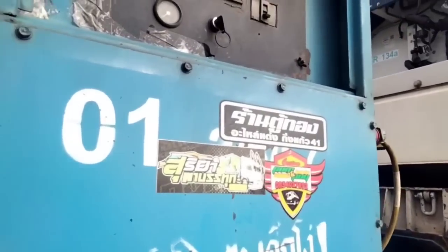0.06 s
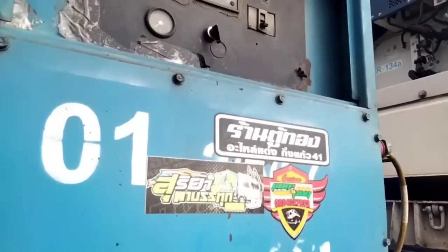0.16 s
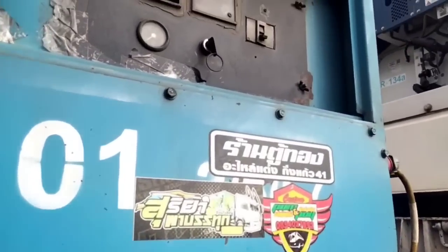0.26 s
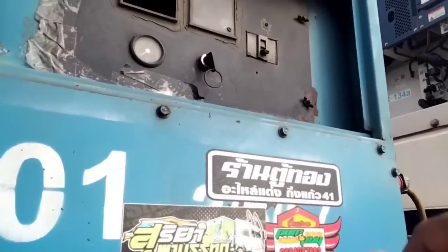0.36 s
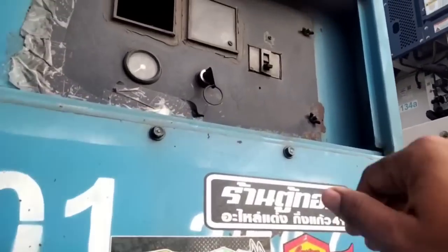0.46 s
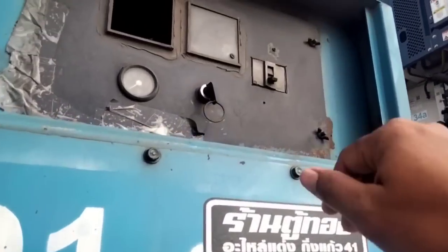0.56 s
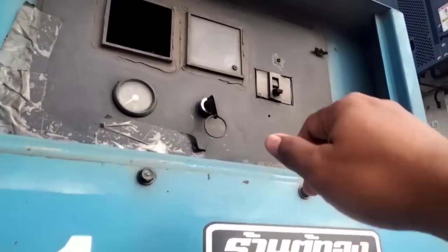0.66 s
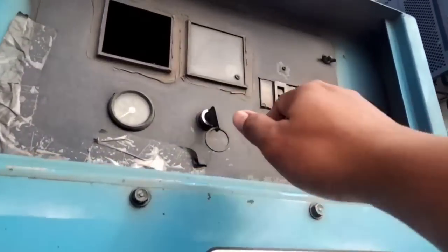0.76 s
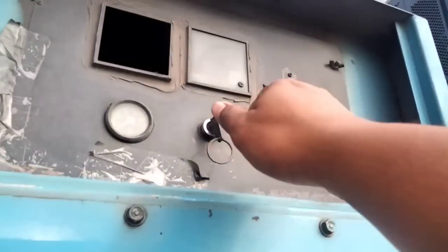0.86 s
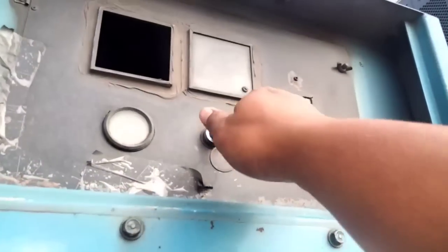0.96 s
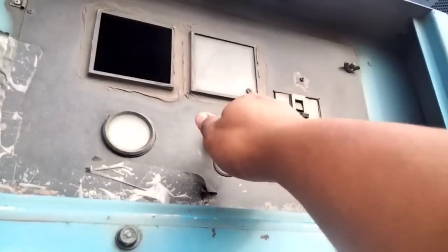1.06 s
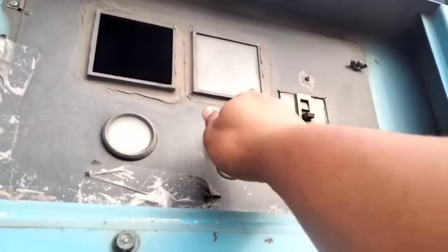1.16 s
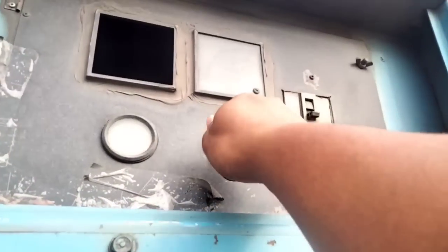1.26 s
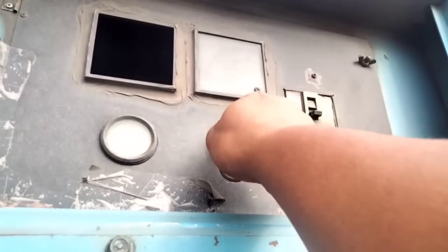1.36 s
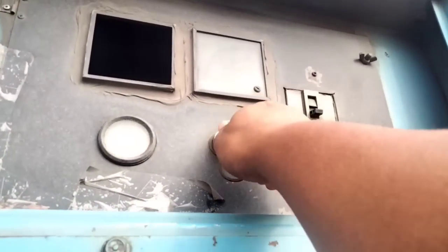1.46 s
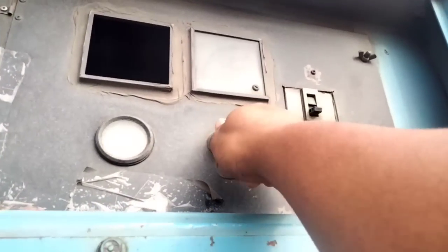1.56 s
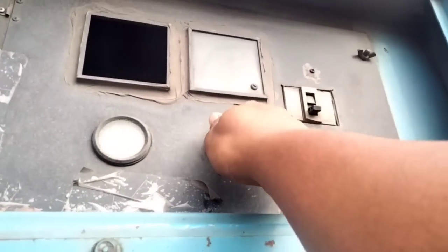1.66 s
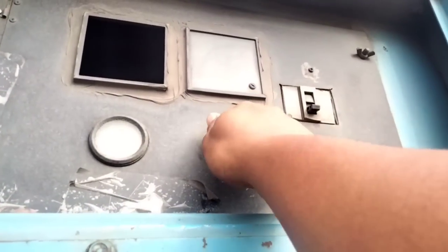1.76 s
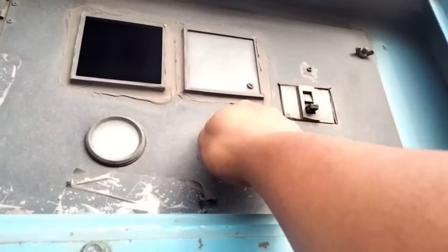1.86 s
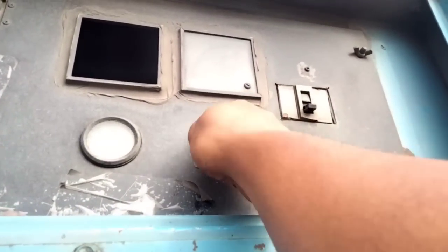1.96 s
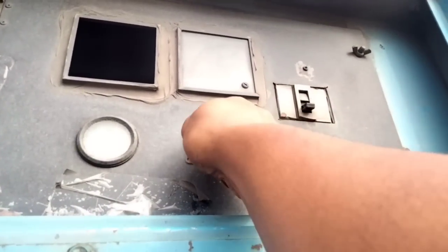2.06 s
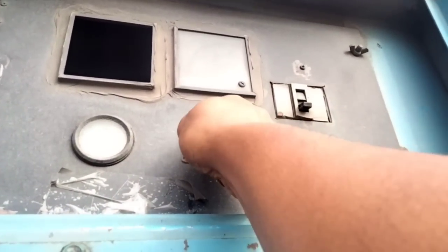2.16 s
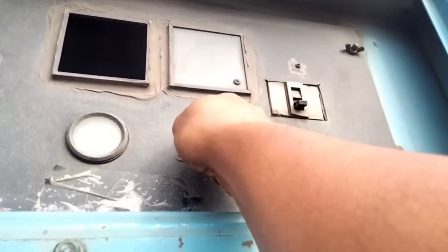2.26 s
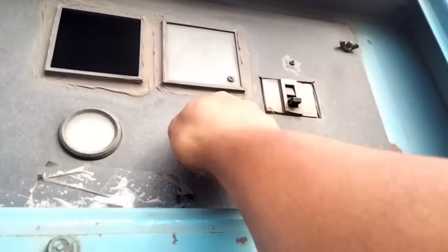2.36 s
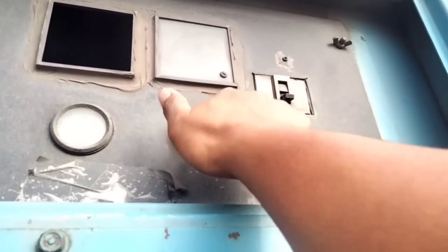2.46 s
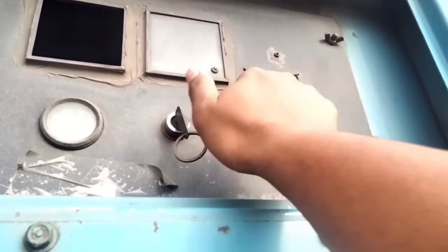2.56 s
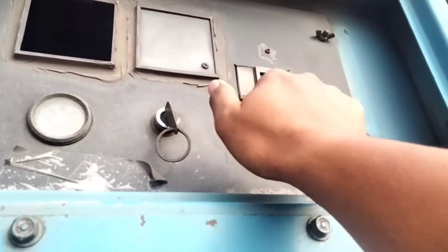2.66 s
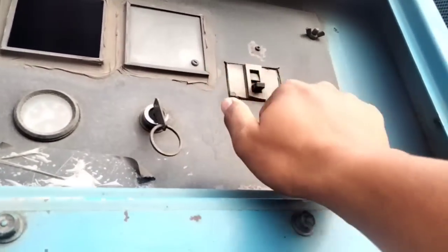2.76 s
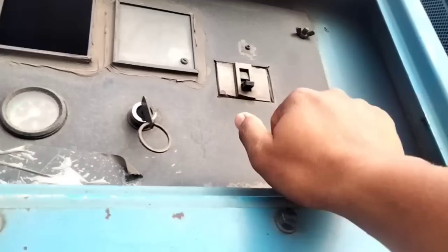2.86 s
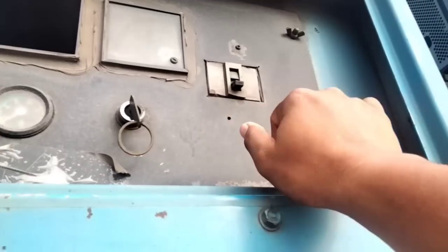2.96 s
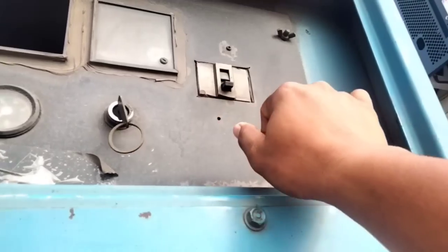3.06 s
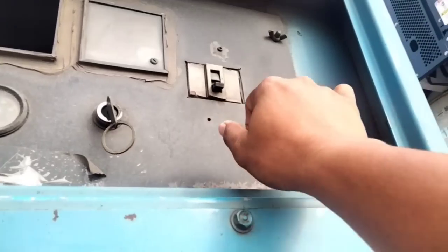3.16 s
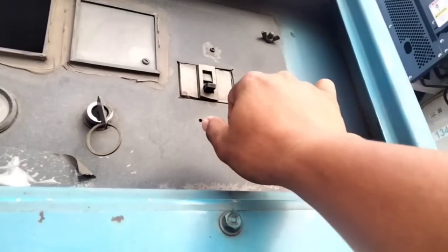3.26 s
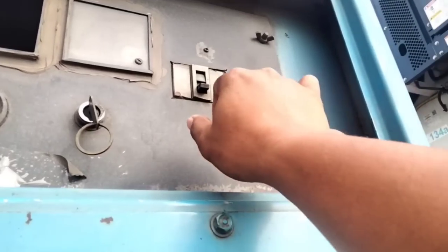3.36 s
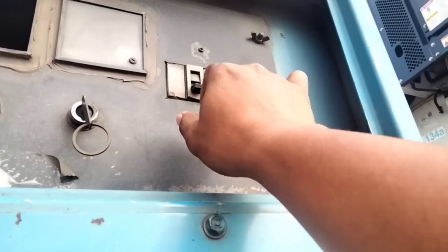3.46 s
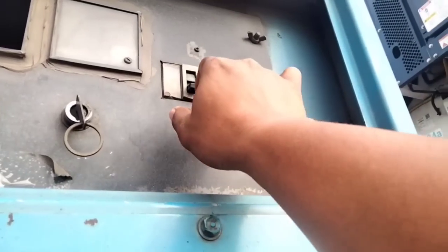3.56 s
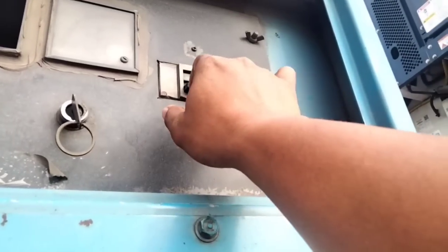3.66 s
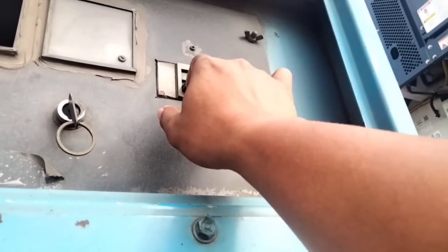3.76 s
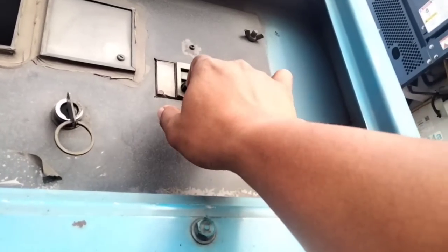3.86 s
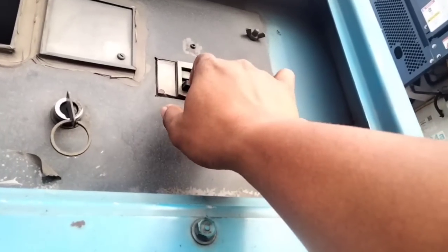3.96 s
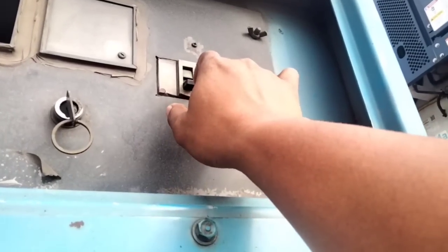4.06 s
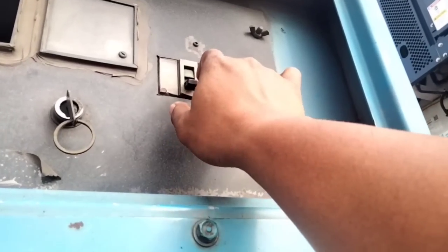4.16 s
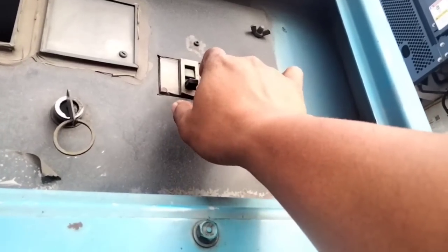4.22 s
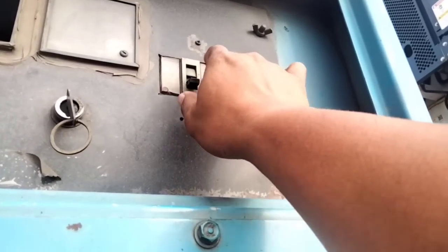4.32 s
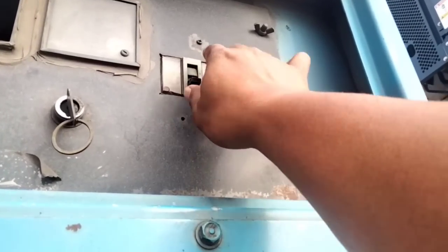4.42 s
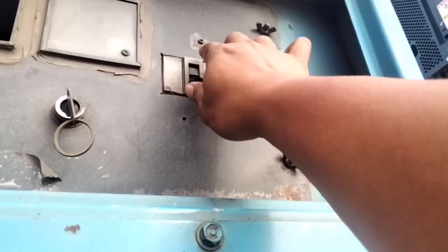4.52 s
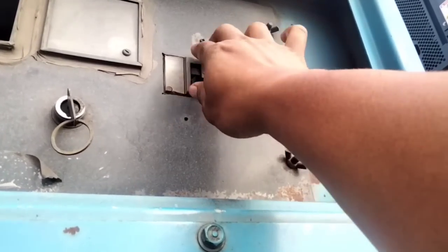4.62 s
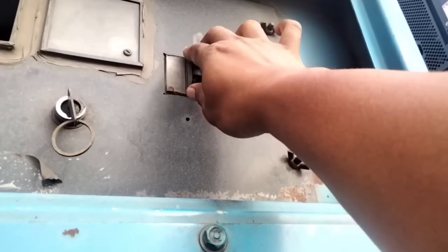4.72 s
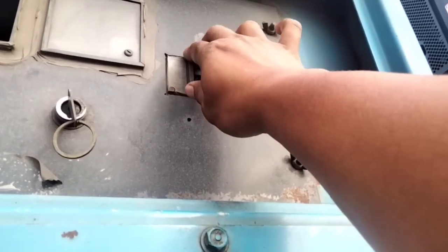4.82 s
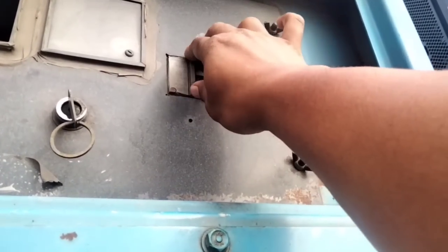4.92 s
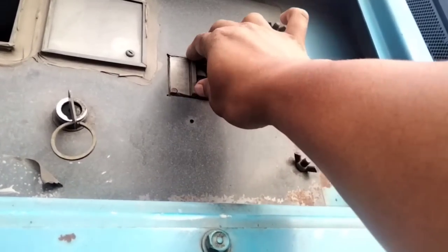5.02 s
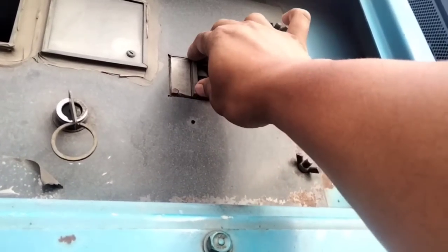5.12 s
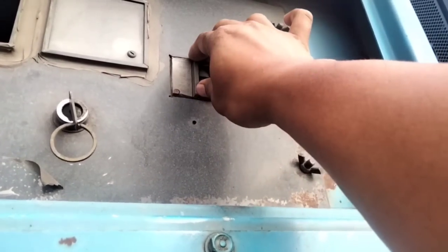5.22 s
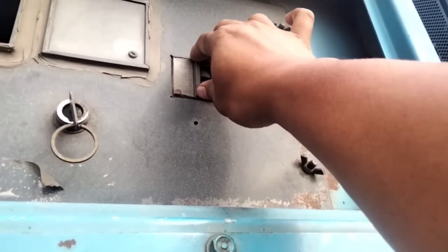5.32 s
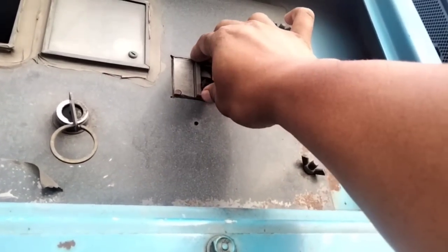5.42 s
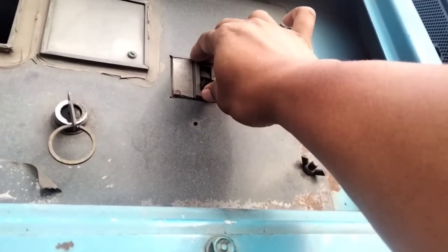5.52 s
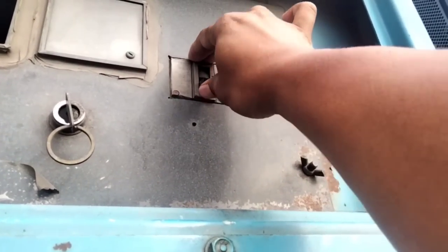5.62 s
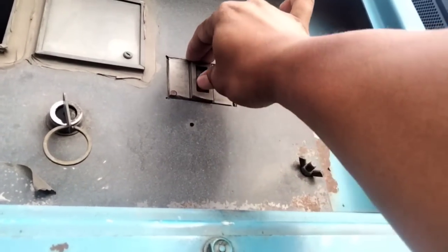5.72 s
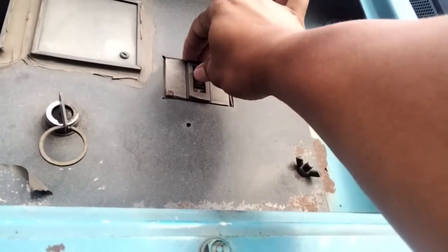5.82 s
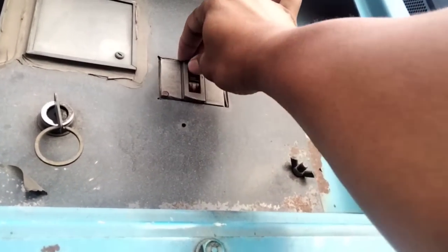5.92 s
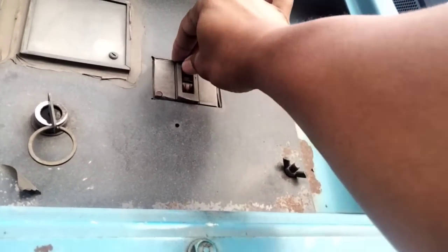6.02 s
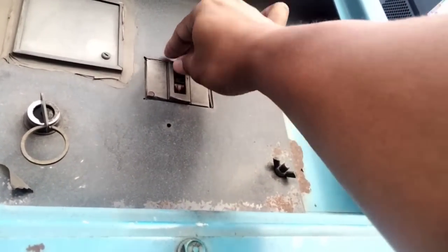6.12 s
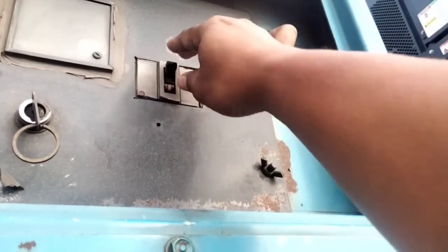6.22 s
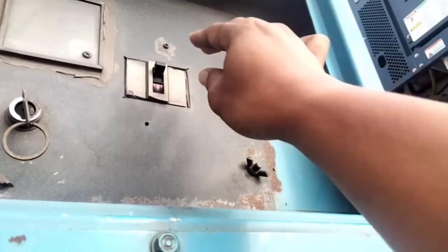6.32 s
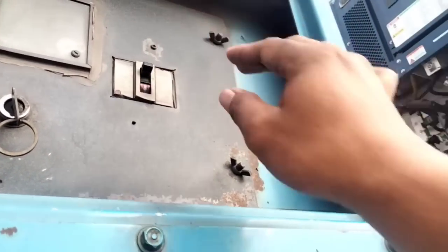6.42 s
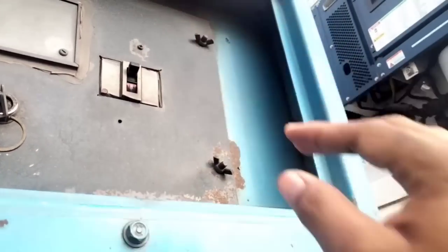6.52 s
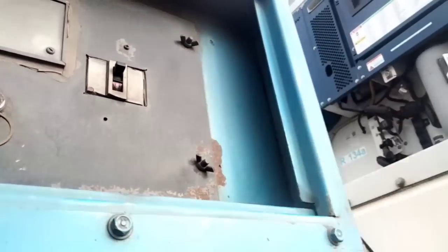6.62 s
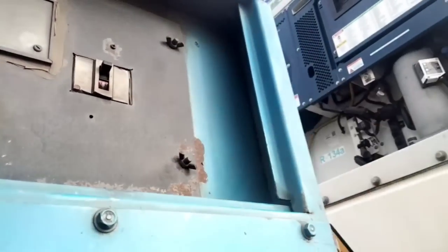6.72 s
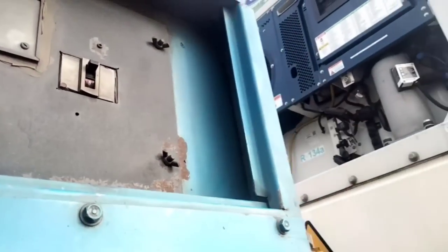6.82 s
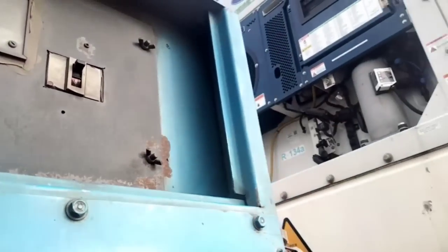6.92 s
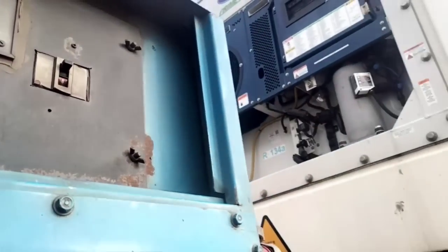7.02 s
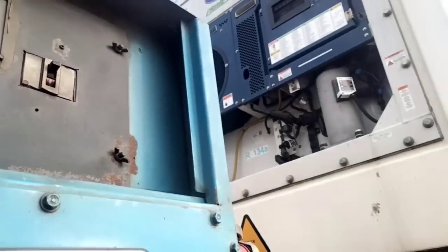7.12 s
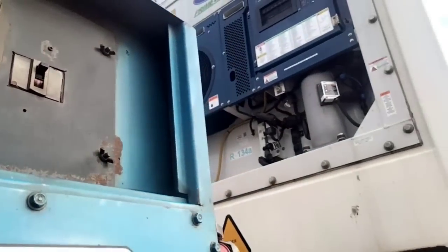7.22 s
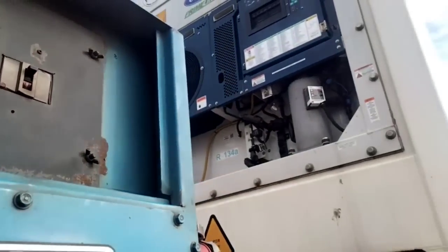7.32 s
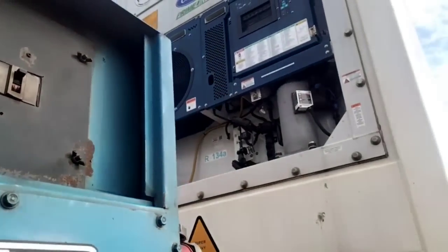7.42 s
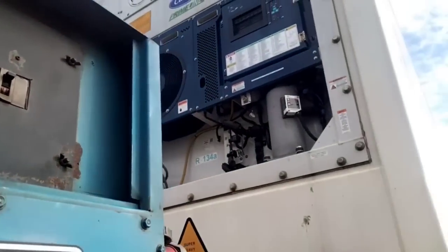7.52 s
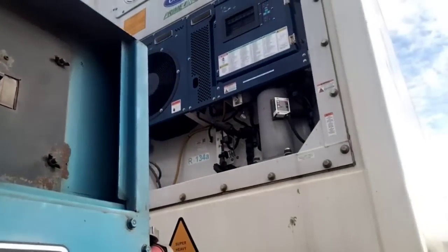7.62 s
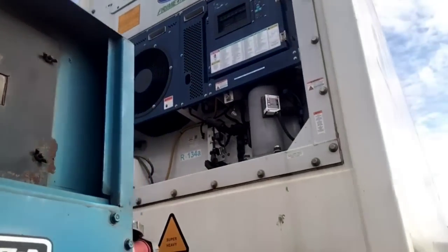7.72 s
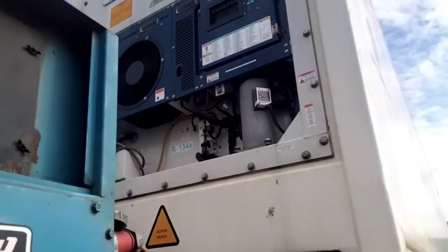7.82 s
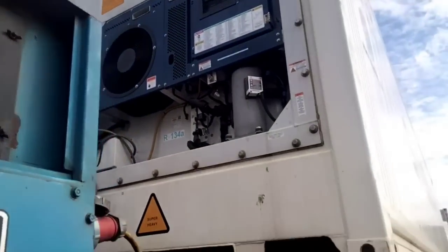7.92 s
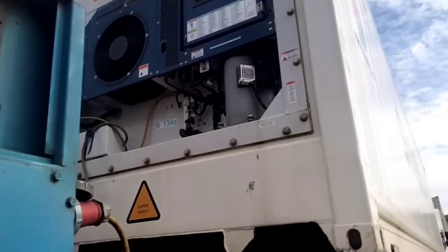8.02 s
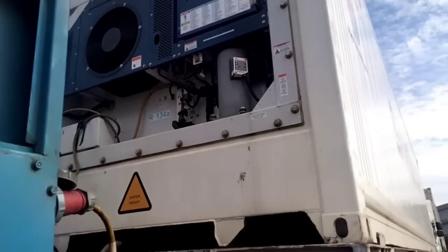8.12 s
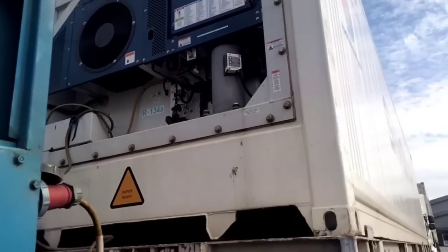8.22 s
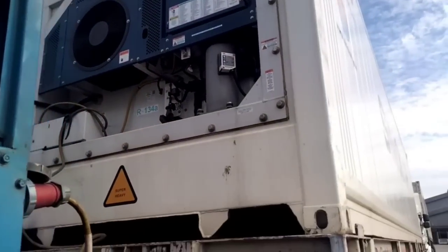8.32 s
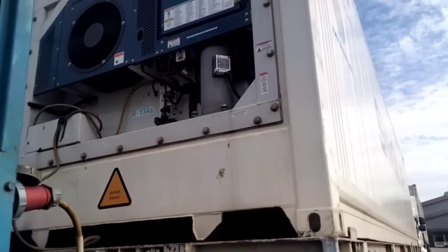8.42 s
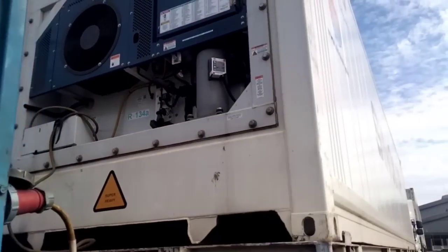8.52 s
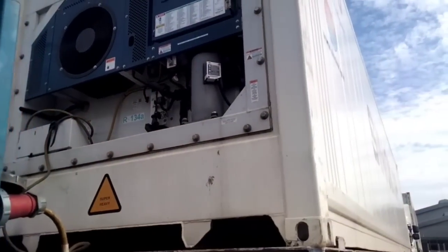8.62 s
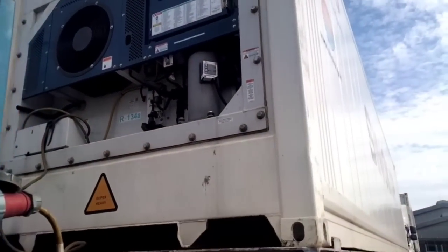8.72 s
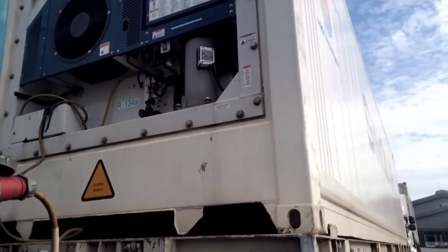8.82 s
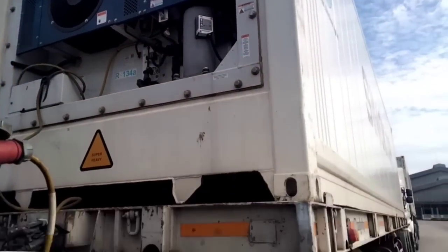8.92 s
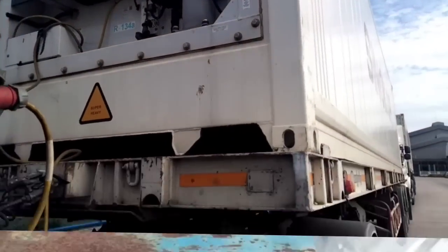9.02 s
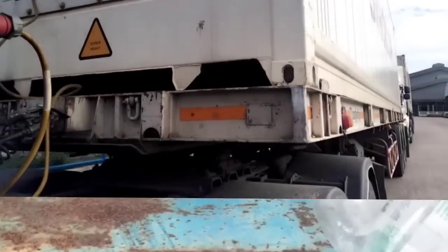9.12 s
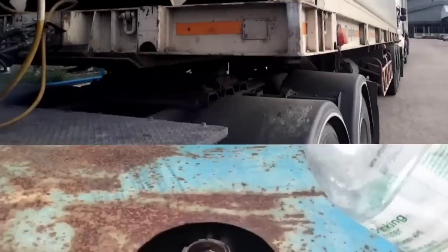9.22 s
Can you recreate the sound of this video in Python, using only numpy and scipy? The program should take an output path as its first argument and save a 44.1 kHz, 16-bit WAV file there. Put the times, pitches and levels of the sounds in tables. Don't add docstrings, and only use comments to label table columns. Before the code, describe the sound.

Handheld close microphone at a generator panel, open air. Quiet low hum and fan wash, fabric rustle and small key clicks come first. A sudden hard clank starts a short harsh gear grind with chirping belt squeals, then the diesel fires unevenly and holds a constant speed: deep drone, rapid knocking, ringing sheet metal, airy valve hiss. One hard switch snap momentarily ducks everything, and the engine runs on to the end.

```python
import sys
import numpy as np
from scipy import signal
from scipy.fft import rfft, irfft, next_fast_len
from scipy.io import wavfile
from scipy.ndimage import uniform_filter1d

SR = 44100
rng = np.random.default_rng(int(sys.argv[2]) if len(sys.argv) > 2 else 0)


def makeup_ratio(level_db):
    decades = np.asarray(level_db, float) / 20
    return 10 ** decades


def dump_mix(stems):
    frames = np.atleast_2d(stems).T
    limited = np.clip(frames, -1, 1)
    pcm = np.round(limited * 32767).astype(np.int16)
    wavfile.write(sys.argv[1], SR, pcm)


N = 409248
T = np.arange(N) / SR

# f/Hz, level/dB per Hz
BLOCK_SPECTRUM = [(240, -8), (400, -5.5), (480, -4), (622, -5), (754, -6.5), (990, -4.5), (1150, -11.5),
                  (1410, -8.5), (1930, -9), (2090, -6), (2510, -12), (3640, -12), (4780, -20),
                  (5240, -22.5), (6000, -19.5), (7800, -16.5), (13200, -120)]
# f/Hz, level/dB per Hz
HISS_SPECTRUM = [(2650, -5.5), (4500, -6), (4800, -5.5), (4990, -9), (5500, -11.5), (8320, 2.5),
                 (14200, -5.5), (15300, -8.5), (16100, -52.5), (16500, -73)]
# f/Hz, width/Hz, level/dB
CASING_MODES = [(220, 25.3, -2), (273.5, 26.5, -1), (147.3, 46, 1), (391, 64, -10.5)]


def noise(n=N):
    return rng.standard_normal(n)


def evened(x):
    return x / np.sqrt(np.mean(x ** 2) + 1e-20)


def columns(rows):
    s, *values = np.transpose(rows)
    return [np.interp(T, s, v) for v in values]


def coloured(x, points):
    hz, db = np.transpose(points)
    size = next_fast_len(len(x))
    bins_hz = np.fft.rfftfreq(size, 1 / SR)
    shape = makeup_ratio(np.interp(np.log(bins_hz + 1), np.log(hz + 1), db))
    return evened(irfft(rfft(x, size) * shape, size)[:len(x)])


def resonate(x, hz, width_hz, steady=0):
    turn = np.exp(2j * np.pi * np.cumsum(hz * np.ones(len(x))) / SR)
    r = np.exp(-np.pi * width_hz / SR)
    slow = signal.lfilter([1], np.convolve([1, -r], [1, -r]), x / turn)
    return evened((turn * slow / abs(slow) ** steady).real)


def ringing(x, modes):
    total = 0
    for hz, width_hz, db in modes:
        mode = signal.lfilter(*signal.iirpeak(hz, hz / width_hz, SR), x)
        total = total + makeup_ratio(db) * mode * np.sqrt(100 / width_hz)
    return evened(total)


def gate(on_s, off_s, fade_s):
    return np.clip((T - on_s) / fade_s, 0, 1) * np.clip((off_s - T) / fade_s, 0, 1)


def stroke(start_s, rise_s, until_s, fall_s, db):
    rise = np.clip((T - start_s) / rise_s, 0, 1)
    fall = np.clip(1 - (T - until_s) / fall_s, 0, 1)
    return makeup_ratio(db) * (rise * fall) ** 1.19


def struck(events, sound):
    envelope, t = np.zeros(N), T[:SR // 2]
    for s, db, t60_s in events:
        envelope[round(s * SR):][:len(t)] += makeup_ratio(db - 11.5 - 60 * t / t60_s)
    return envelope * sound


def flutter(hz, db):
    return np.interp(T * hz, np.arange(2000), makeup_ratio(db * noise(2000)))


def yard():
    far_engines = [(53.783, .0127), (55.87, .0055)]
    far_db = [-35.5, -44.5]
    # f/Hz, level/dB per Hz
    wash_spectrum = [(2.9, -60), (5.0, -29.5), (27, -13.5), (36, -7), (59, -6), (82, -20), (165, -15.5),
                     (186, -20.5), (229, -16.5), (294, -22.5), (700, -30.5), (910, -71.5), (1540, -120)]
    # f/Hz, level/dB per Hz
    fan_spectrum = [(290, -32), (500, -15.5), (731, -11), (799, -0.5), (834, -8.5), (898, -3), (1070, -7),
                    (2770, -11.5), (3020, -13.5), (5510, -20), (7170, -17), (8540, -16.5), (10500, -26),
                    (14700, -29.5), (16500, -43.5)]
    # f/Hz, width/Hz, level/dB
    fan_modes = [(2050, 130, 1), (2970, 100, -3), (3990, 160, -9), (8370, 400, -7)]
    phases = [2 * np.pi * hz * (T - s) for hz, s in far_engines]
    hum = sum(makeup_ratio(db) * np.cos(phase) for db, phase in zip(far_db, phases))
    hum = hum + makeup_ratio(-47.5) * flutter(6, 2) * np.sin(3 * phases[0])
    low, high = noise((2, N))
    wash = makeup_ratio(-39) * coloured(low, wash_spectrum) + makeup_ratio(-53.5) * ringing(low, [(228.3, 13, 0)])
    fans = coloured(high, fan_spectrum) + .3 * flutter(5, 1.3) * ringing(high, fan_modes)
    return np.sqrt(2) * hum + flutter(12, 0.98) * (wash + makeup_ratio(-48.5) * fans)


def cloth():
    # start/s, rise/s, hold until/s, fall/s, level/dB
    drags = [(-.1, 0.34, 0.282, .08, -42.5), (.3, .08, 0.486, 0.208, -42.5)]
    # f/Hz, level/dB per Hz
    cloth_spectrum = [(350, -26.5), (600, -2.5), (792, -14.5), (1270, -3), (1870, 0), (2470, -9.5),
                      (2800, 0), (4800, -17.5), (7490, -11), (9340, -17.5), (13800, -19), (15800, -20),
                      (16500, -44)]
    return sum(stroke(*row) for row in drags) * flutter(61.3, 1.26) * coloured(noise(), cloth_spectrum)


def grit_scuff():
    # start/s, rise/s, hold until/s, fall/s, level/dB
    scuff_stroke = (.716, .035, .785, .055, -33.5)
    # f/Hz, level/dB per Hz
    grit_spectrum = [(350, -54), (600, -24.5), (760, -6), (897, -23), (1000, -6), (3740, -3.5),
                     (5010, -14.5), (8250, -13), (15200, -18.5), (15800, -21), (16500, -49)]
    grains = noise() * (1 + 5 * (rng.random(N) < 400 / SR))
    return stroke(*scuff_stroke) * flutter(150, 1.47) * coloured(grains, grit_spectrum)


def keys():
    # t/s, peak/dB, t60/s
    ticks = [(0.2494, -41, 0.015), (0.2768, -33.5, 0.015), (1.0794, -42.5, 0.015), (1.1218, -22.5, 0.019),
             (1.163, -25.5, 0.015), (1.1922, -28.5, 0.015), (1.2221, -34.5, 0.015), (1.713, -27.5, 0.015),
             (1.8244, -35.5, 0.015), (1.9769, -28, 0.015)]
    # t/s, peak/dB, t60/s
    solenoid = [(1.997, -27, .08)]
    knocks = [(.25, -26, .03), (.278, -24.5, .03), (1.08, -37.5, .02)]
    bright = struck(ticks + solenoid, coloured(noise(), HISS_SPECTRUM))
    return bright + struck(knocks, coloured(noise(), BLOCK_SPECTRUM))


def breaker():
    # t/s, peak/dB, t60/s
    snaps = [(5.981, -5, 0.0333)]
    bright = coloured(noise(), HISS_SPECTRUM)
    snap = struck(snaps, bright + 0.32 * coloured(noise(), BLOCK_SPECTRUM))
    return snap + struck([(5.985, -29.5, 0.28)], ringing(bright, [(4300, 49, 0)]))


def shoves():
    # t/s, length/s, level/dB
    pushes = [
        (2.396, 0.081, -23),
        (2.803, .12, -36),
        (6.03, .14, -35),
        (9.22, .12, -34.5),
    ]
    return sum(makeup_ratio(db) * np.exp(-(2.5 * (T - s) / length_s) ** 2) for s, length_s, db in pushes)


def whistle(s, length_s, hz, glide, db):
    t = np.arange(-length_s, length_s, 1 / SR)
    tone = resonate(noise(len(t)), hz + glide * t, 30 + .026 * hz, steady=.5)
    return round((s - length_s) * SR), makeup_ratio(db + 2) * tone * np.exp(-(2.5 * t / length_s) ** 2)


def starter_grind():
    # t/s, drive/dB, load 0-1
    crank = [(2.012, -22.5, 0.58), (2.066, -25, 0.74), (2.128, -25, .86), (2.18, -31.5, .35),
             (2.226, -34.5, 0.54), (2.238, -22.5, 0.63), (2.265, -28, 0.17), (2.42, -27.5, 0.19),
             (2.5, -31.5, .35)]
    # t/s, peak/dB, treble minus peak/dB
    clanks = [(2.01, -5.5, -6), (2.032, -11, -7), (2.156, -21.5, 10.5), (2.197, -24.5, 6.5),
              (2.235, -8, -8.5), (2.261, -15.5, 5.5), (2.332, -16, 3), (2.394, -21.5, 1),
              (2.463, -20.5, 7.5), (2.574, -15, -6)]
    # f/Hz, level/dB per Hz
    gear_spectrum = [(240, -35), (400, -12.5), (463, -16), (817, 1.5), (1000, 1.5), (1150, -2.5),
                     (1850, -13), (2320, 0), (2750, -6.5), (4780, -17.5), (6000, -17), (7800, -45),
                     (13200, -120)]
    # f/Hz, width/Hz, level/dB
    housing_modes = [(872, 54, -3), (1464, 34, -2.5), (1735, 53, -3.5), (1993, 42, 0), (2329, 78, -1.5),
                     (2880, 90, -14.5), (3240, 65, -11)]
    clank_t60_s = 0.1006
    drive_db, load = columns(crank)
    load_db = 24 * (load - .5)
    casing_db = -28 + 0.31 * (drive_db + 26)
    teeth = noise((3, N)) * flutter(90, 1.6)
    casing = gate(2.018, 99, 0.0134) * ringing(teeth[0], CASING_MODES)
    gears = evened(coloured(teeth[1], gear_spectrum) + 0.78 * ringing(teeth[1], housing_modes))
    hiss = coloured(teeth[2], HISS_SPECTRUM)
    grind = makeup_ratio(casing_db) * casing
    grind = grind + makeup_ratio(drive_db + load_db - 6) * gears
    grind = grind + makeup_ratio(drive_db - load_db + 0.5) * hiss
    dull = struck([(s, db - 1.5, clank_t60_s) for s, db, _ in clanks], gears)
    sharp = struck([(s, db + top_db + 2.5, clank_t60_s) for s, db, top_db in clanks], hiss)
    return grind * gate(2.009, 2.56, 0.00265) + dull + sharp


def starter_tones():
    # peak t/s, length/s, f/Hz, glide/Hz per s, level/dB
    squeals = [
        (2.1, .085, 1180, 3200, -25.5),
        (2.25, .04, 820, -1200, -28),
        (2.36, .12, 800, -900, -31),
        (2.44, .08, 680, -900, -34),
        (2.59, .06, 930, -800, -31),
        (2.67, .06, 1780, 1000, -33),
    ]
    # t/s, f/Hz, level/dB
    pings = [(2.018, 2950, -24), (2.02, 2000, -27), (2.037, 850, -24), (2.04, 8900, -28),
             (2.065, 4900, -33), (2.165, 9300, -30), (2.24, 2300, -26), (2.243, 1700, -28),
             (2.242, 4950, -29), (2.24, 8100, -27), (2.27, 9700, -27), (2.35, 5250, -27),
             (2.35, 10500, -27), (2.47, 8550, -24), (2.495, 7700, -30)]
    # t/s, f/Hz, level/dB
    booms = [(2.05, 215, -24.5), (2.065, 285, -29), (2.265, 218, -27), (2.655, 260, -29), (2.41, 240, -31),
             (2.12, 55, -34), (2.315, 55, -29), (2.375, 48, -31), (2.54, 50, -33)]
    # f/Hz, level/dB
    labour = [(2370, -22), (4800, -30), (8300, -29)]
    tones = squeals + [(s, .025, hz, 0, db) for s, hz, db in pings]
    tones = tones + [(s, .075, hz, 0, db) for s, hz, db in booms]
    tones = tones + [(2.118, .063, hz, 0, db) for hz, db in labour]
    out = np.zeros(N)
    for row in tones:
        start, sound = whistle(*row)
        out[start:start + len(sound)] += sound
    return out


def starter():
    return (starter_grind() + starter_tones()) * gate(2.009, 99, .002)


def beaten(cycle, column, decay, bed_db):
    # place 0-1, knock/dB, hiss/dB
    blows = [(.02, -10.5, -0.5), (0.088, 4.5, -1.5), (.18, -0.5, -15.5), (.27, -2.5, -16.5),
             (0.321, 3.5, -1.5), (0.378, -7, 3), (0.591, -5.5, -2.5), (.65, -6, -1), (.755, -8, -0.5),
             (.83, -5.5, -6), (0.898, -1, -0.5)]
    power = makeup_ratio(2 * bed_db)
    for row in blows:
        since = cycle - row[0] + 1
        sizes = makeup_ratio(2 * (row[column] + 2.0 * noise(200)))
        power = power + sizes[since.astype(int)] * np.exp(-(since % 1) / decay)
    return np.sqrt(power)


def patchy(x, db):
    z = signal.stft(x, nperseg=512, noverlap=384)[2]
    patches = uniform_filter1d(noise(z.shape), size=2, axis=0)
    patches = evened(uniform_filter1d(patches, size=9, axis=1))
    return signal.istft(z * makeup_ratio(db * patches - db ** 2 / 9), nperseg=512, noverlap=384)[1][:N]


def exhaust_orders(fires, turned):
    exhaust = [(1.75, -23.5), (2, -17), (2.25, -24), (2.5, -29), (2.75, -29.5), (3, -10.5), (3.25, -25.5),
               (3.5, -17.5), (3.75, -19), (4, -4.5), (4.5, -18), (4.75, -20.5), (5, -16), (5.25, -17.5),
               (5.5, -10.5), (6, -17.5), (6.25, -19.5), (6.75, -23), (7, -15), (8, -17), (8.25, -23.5),
               (8.75, -28.5), (9, -19), (9.25, -25), (9.5, -27.5), (9.75, -23.5), (10, -25), (10.25, -27),
               (10.5, -25)]
    t, knots = T[::8], np.arange(100)
    low = np.zeros(len(t))
    for multiple, db in exhaust:
        waver = np.interp(t * 9, knots, makeup_ratio(db + 1.01 * noise(len(knots))))
        shade = makeup_ratio(-4 * (multiple > 3.6) * turned[::8])
        low += waver * shade * np.sin(2 * np.pi * (multiple * fires[::8] + rng.random()))
    return evened(signal.resample_poly(low, up=8, down=1)[:N])


def exhaust_drone(fires, turned):
    # f/Hz, level/dB per Hz
    roar_spectrum = [(12, -34), (20, -6), (59, -16), (107, -6), (209, -2.5), (248, -3), (290, -3),
                     (330, -13.5), (600, -19), (780, -59), (1320, -120)]
    settled = gate(2.6, 99, .2)
    lumpy = ringing(noise(), CASING_MODES) * np.sqrt(1 - settled ** 2)
    roar = makeup_ratio(-12) * coloured(noise(), roar_spectrum)
    return evened(exhaust_orders(fires, turned) * settled + lumpy + roar)


def mounts():
    # t/s, level/dB
    rocking = [
        (2.5, -57.5),
        (2.58, -29),
        (3.0, -30),
        (3.6, -44),
    ]
    return makeup_ratio(columns(rocking)[0]) * resonate(noise(), 85.62, 2.6, steady=1.0)


def block_knock(cycle, turned, repeated):
    # f/Hz, level/dB per Hz
    turned_spectrum = [(240, -20.5), (400, 1.5), (485, -5), (575, -4.5), (629, -6), (946, -10),
                       (1190, -8.5), (1420, -5.5), (1590, -10), (1980, -10.5), (2450, -11.5), (3250, -11.5),
                       (3690, -8), (5300, -17.5), (6000, -16), (7800, -40), (13200, -120)]
    rattle = (1.5 * repeated + noise()) * beaten(cycle, column=1, decay=0.04, bed_db=1.0)
    return (1 - turned) * coloured(rattle, BLOCK_SPECTRUM) + turned * coloured(rattle, turned_spectrum)


def panels(x, lines, width_hz):
    return ringing(x, [(hz, width_hz + hz / 220, db) for hz, db in lines])


def singing_panels(turned, repeated):
    # f/Hz, rms/dB
    facing_lines = [(694.4, -50), (834.4, -43.5), (925.9, -58), (990.5, -41.5), (1082, -46.5),
                    (1254, -48.5), (1373, -54), (1410, -50.5), (1604, -48.5), (1776, -56), (2089, -43.5),
                    (2143, -47.5), (2993, -50.5), (3542, -60), (3946, -53), (4452, -55), (4651, -45),
                    (4780, -67.5)]
    # f/Hz, rms/dB
    turned_lines = [(613.7, -50), (861.3, -49), (925.9, -55.5), (969.0, -48), (1244, -52), (1475, -44),
                    (1776, -52), (1922, -45), (2143, -56), (3671, -40.5)]
    shake = repeated + .35 * noise()
    facing = panels(shake, facing_lines, width_hz=6.2)
    return (1 - turned) * facing + 0.765 * turned * panels(shake, turned_lines, width_hz=8.6)


def valve_hiss(cycle, turned):
    # f/Hz, level/dB per Hz
    turned_spectrum = [(2650, -22), (4500, -4), (5530, -13.5), (6580, -8), (8180, 1.5), (10700, -2.5),
                       (14300, 0), (15300, -6), (16100, -15), (16500, -49)]
    air = noise() * beaten(cycle, column=2, decay=0.087, bed_db=-2.0)
    return (1 - turned) * coloured(air, HISS_SPECTRUM) + turned * coloured(air, turned_spectrum)


def valve_ticks(cycle):
    seats = np.exp(-((cycle - .75) % 1) / .03) + .6 * np.exp(-((cycle - .315) % 1) / .03)
    highpass = signal.butter(4, 9000, "high", fs=SR, output="sos")
    return evened(signal.sosfilt(highpass, noise() * seats * flutter(13, 3.)))


def engine():
    # t/s, firing rate/Hz
    speed = [
        (2.5, 31),
        (2.6, 44),
        (2.7, 51),
        (2.78, 53.6),
        (2.9, 52.3),
        (3.2, 52.2),
        (3.6, 52.252),
        (9.28, 52.252),
    ]
    # t/s, fuel against steady running/dB
    fuel = [
        (2.52, -25),
        (2.586, 0),
        (2.628, -3.5),
        (2.682, -18.5),
        (2.812, 0),
        (2.93, 1),
        (3.2, -1),
        (3.45, 0.5),
    ]
    # t/s, level/dB
    near = [(2.5, 0), (3.8, 0.5), (3.92, -1), (4.05, 0), (4.68, 1), (4.84, -3), (5.05, 0), (5.47, 0),
            (5.63, -2), (5.75, -1), (5.9, -2.5), (6.12, -1), (6.3, -2), (6.38, .5), (6.57, -2), (6.7, 0.5),
            (8.87, -1.5), (9.2, -6)]
    # t/s, share turned away 0-1
    turn = [(2.5, 0), (5.5, 0.16), (6.9, 0.32), (7.5, 0.81), (9.28, 0.73)]
    # thump, drone, knock, hiss; steady level/dB
    steady_db = np.array([[-21], [-22.5], [-25.5], [-23]])
    fuel_share = np.array([[1], [.2], [.05], [.1]])
    near_share = np.array([[.2], [.8], [.9], [1.1]])
    turned_db = np.array([[-.6], [-.3], [-1.2], [.3]])
    fires = np.cumsum(columns(speed)[0]) / SR
    fires = fires - fires[round(6.0512 * SR)] % 4
    cycle = fires / 4 + 1
    turned = np.clip(columns(turn)[0], 0, 1)
    levels_db = steady_db + fuel_share * columns(fuel)[0] + near_share * columns(near)[0]
    thump_db, drone_db, knock_db, hiss_db = levels_db + turned_db * turned
    steps = 3376
    repeated = noise(steps)[(cycle % 1 * steps).astype(int)]
    bass = makeup_ratio(thump_db) * np.sqrt(2) * np.cos(2 * np.pi * fires)
    bass = bass + makeup_ratio(drone_db) * exhaust_drone(fires, turned) + mounts()
    clatter = makeup_ratio(knock_db) * block_knock(cycle, turned, repeated)
    clatter = clatter + makeup_ratio(hiss_db) * valve_hiss(cycle, turned)
    upper = patchy(clatter, db=2.3)
    upper = upper + makeup_ratio(knock_db - 7.5) * singing_panels(turned, repeated)
    upper = upper + makeup_ratio(hiss_db - 13) * valve_ticks(cycle)
    return (bass + flutter(30, 0.31) * upper) * gate(2.496, 99, 0.0716)


def scene():
    # t/s, gain/dB
    duck = [
        (5.966, -2),
        (5.974, -7),
        (5.988, -11.5),
        (6.02, -15.5),
        (6.081, -12.5),
        (6.084, -1.5),
    ]
    ducked = yard() + cloth() + grit_scuff() + keys() + starter() + engine()
    return (ducked * makeup_ratio(columns(duck)[0]) + breaker() + shoves())[None]


def roll_off(x):
    return signal.sosfilt(signal.butter(12, 17050, fs=SR, output="sos"), x)


def record(dry):
    limited = 0.6468 * np.tanh(dry / 0.5932)
    lowpass = signal.firwin(511, 15950, window=("kaiser", 9), fs=SR)
    edged = signal.oaconvolve(limited, lowpass[None], "same")
    return roll_off(edged)


dry = scene()
out = record(dry)
dump_mix(out)
```